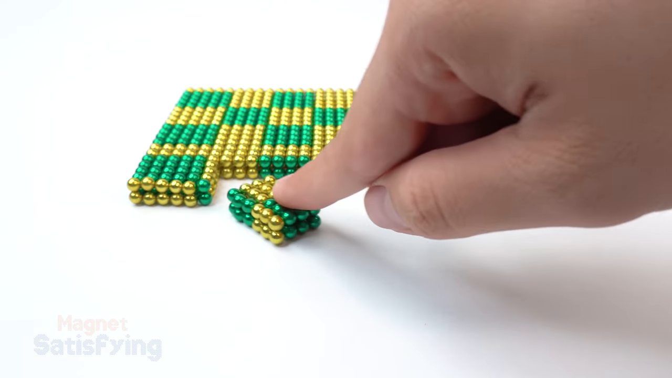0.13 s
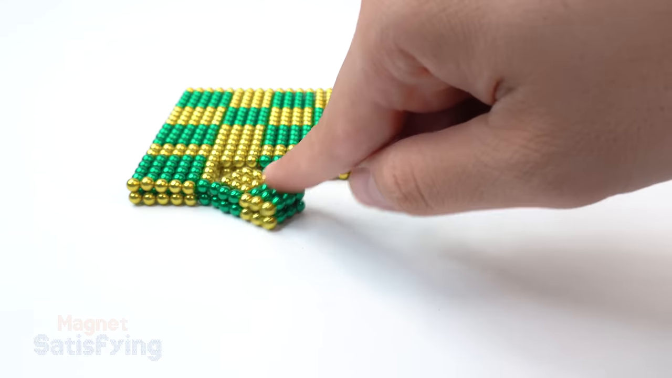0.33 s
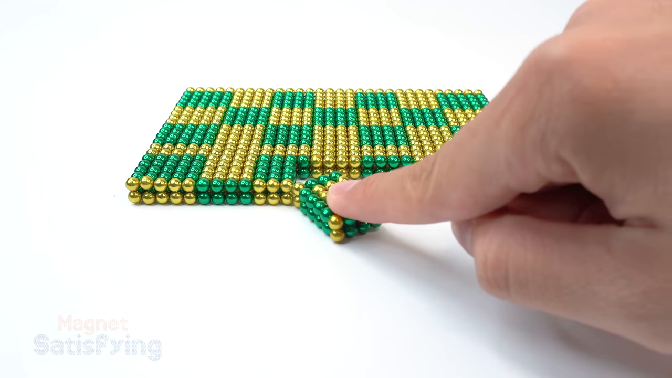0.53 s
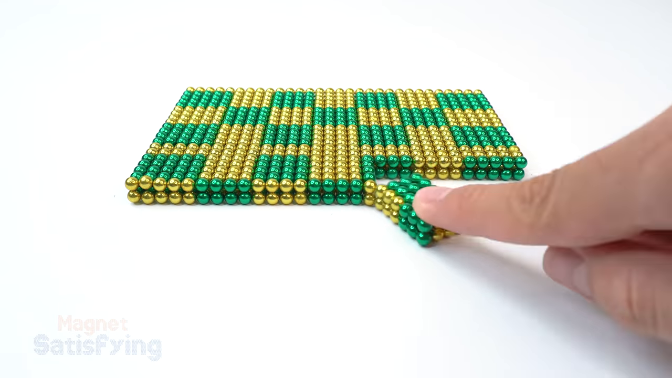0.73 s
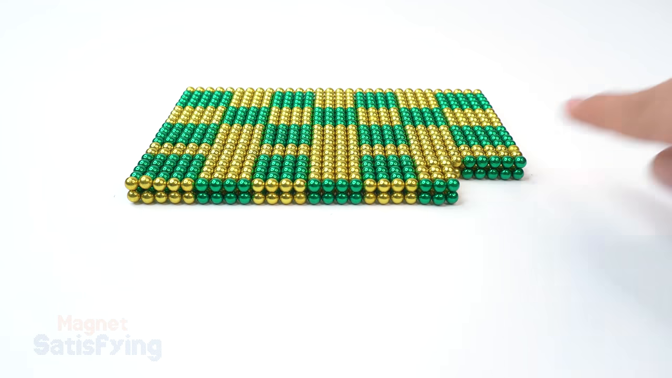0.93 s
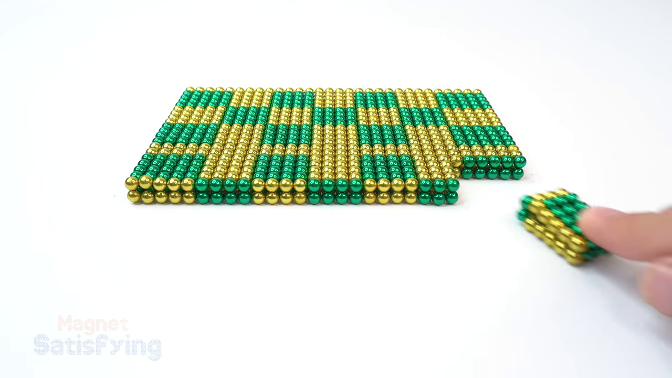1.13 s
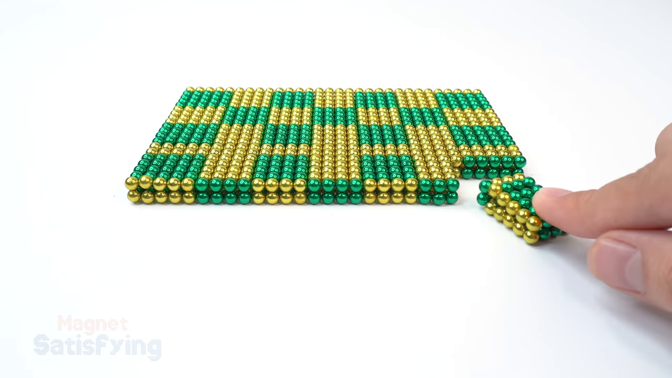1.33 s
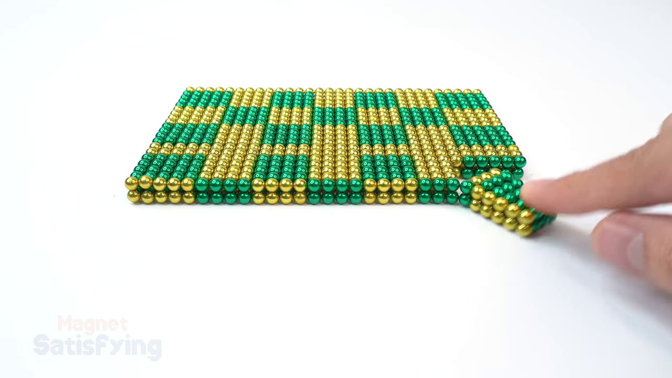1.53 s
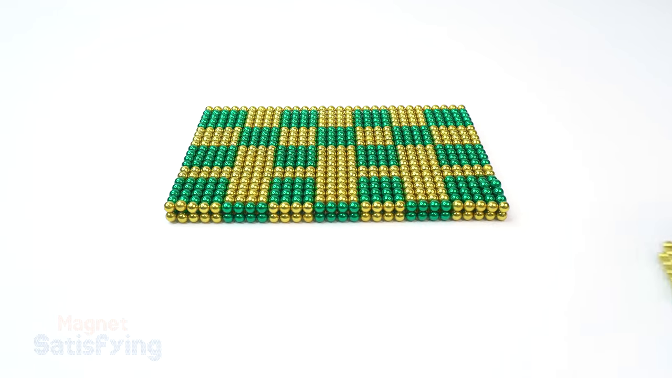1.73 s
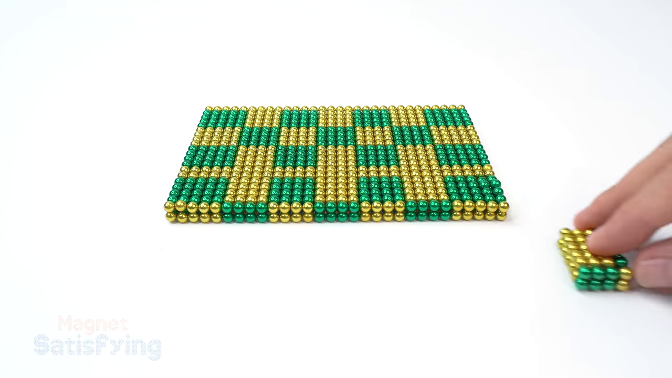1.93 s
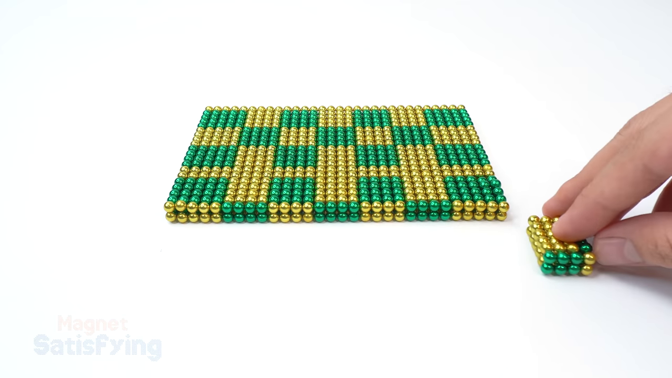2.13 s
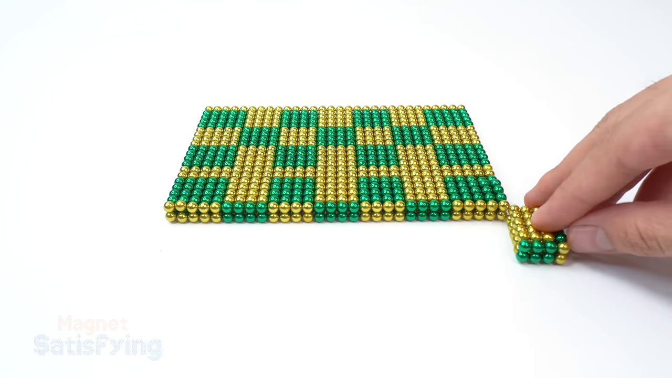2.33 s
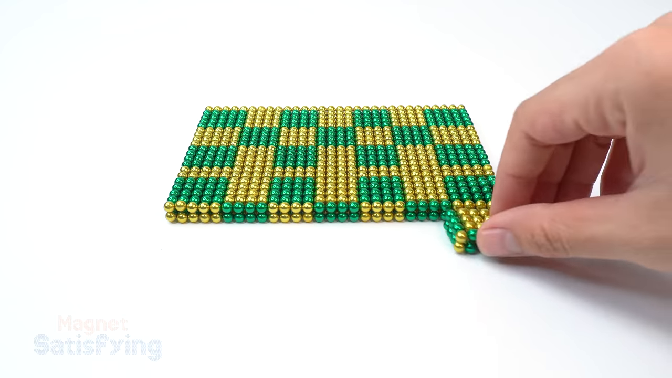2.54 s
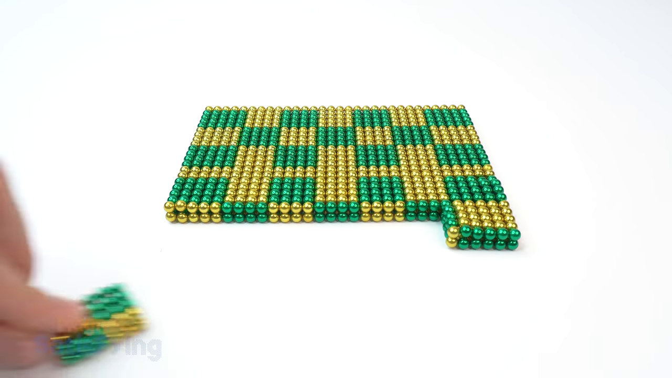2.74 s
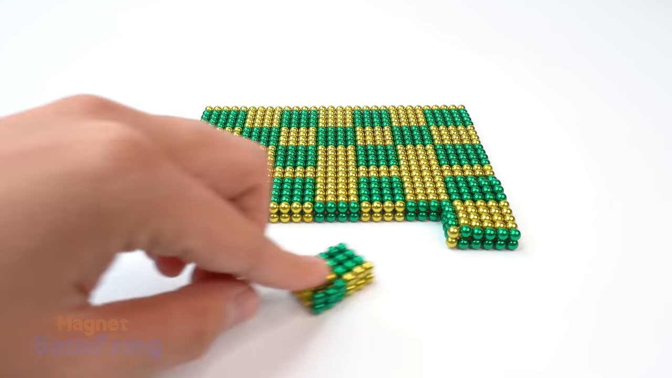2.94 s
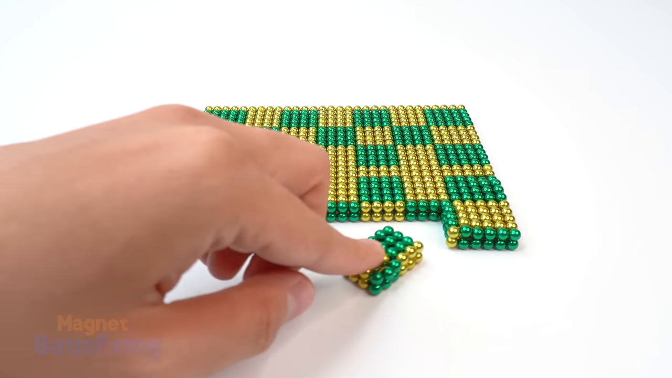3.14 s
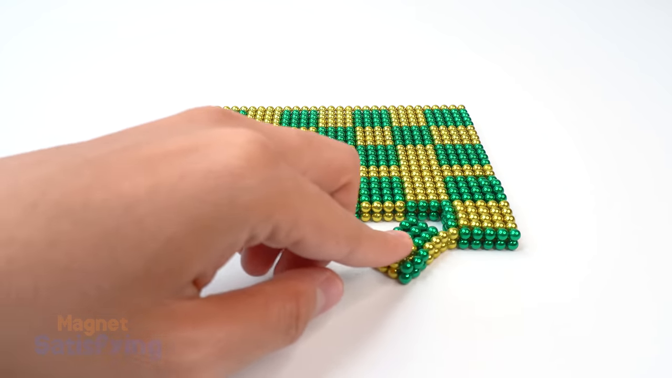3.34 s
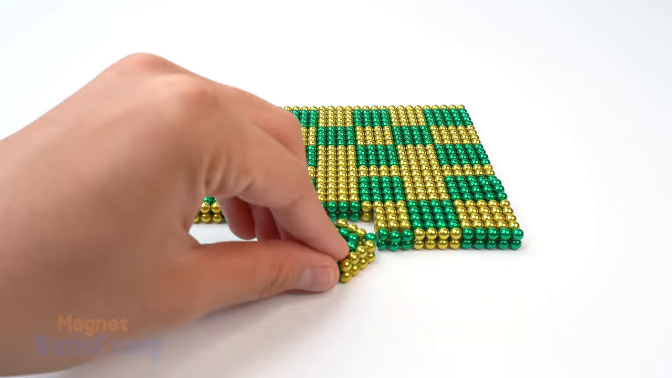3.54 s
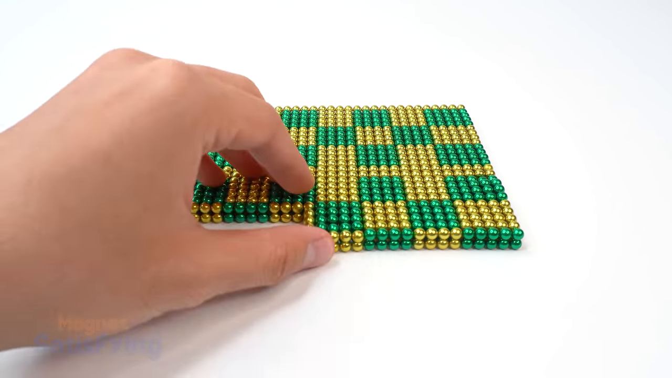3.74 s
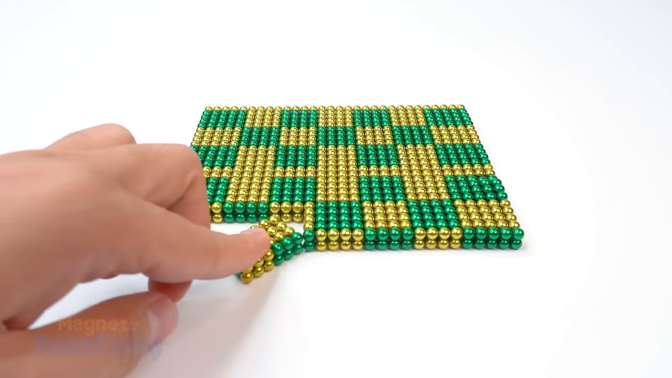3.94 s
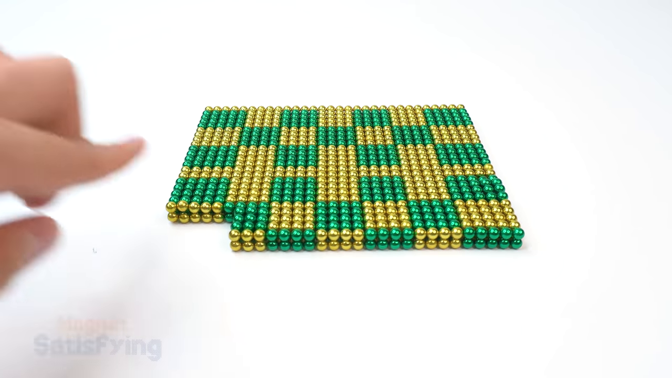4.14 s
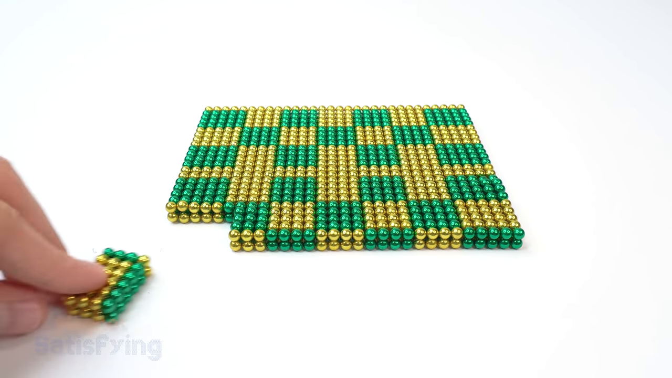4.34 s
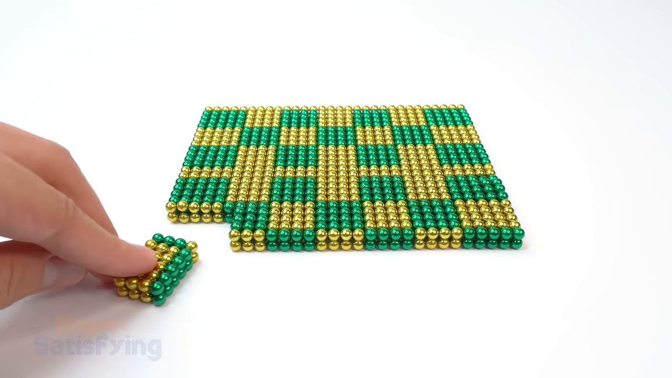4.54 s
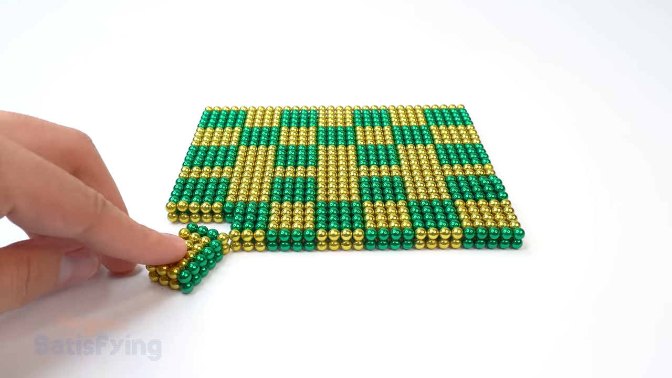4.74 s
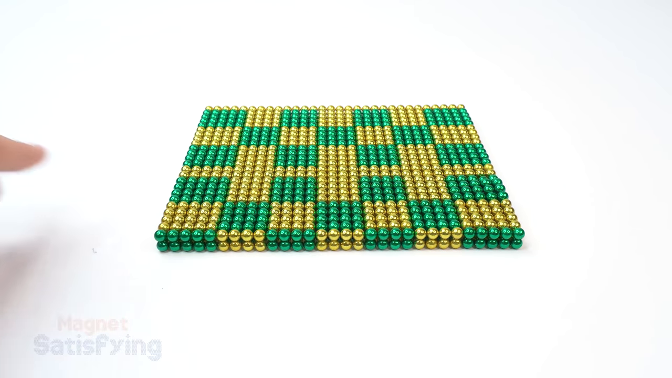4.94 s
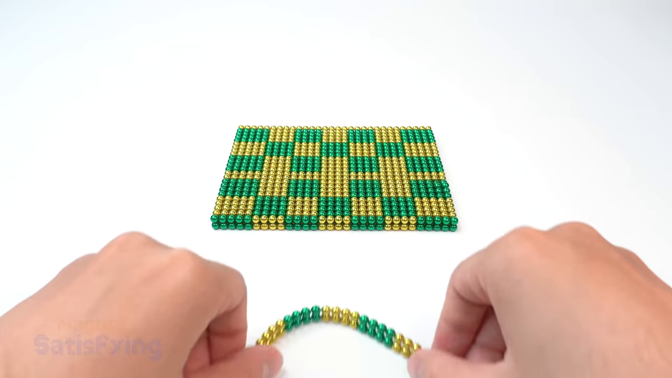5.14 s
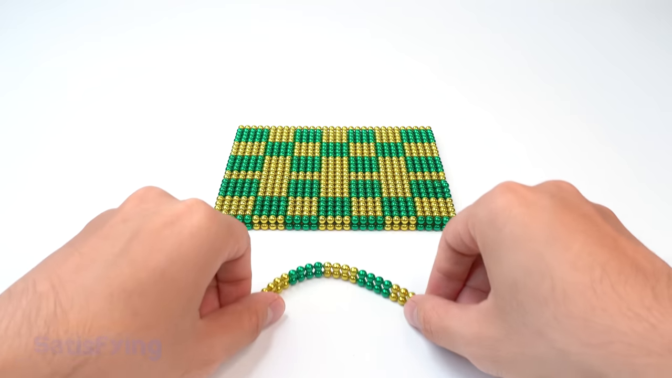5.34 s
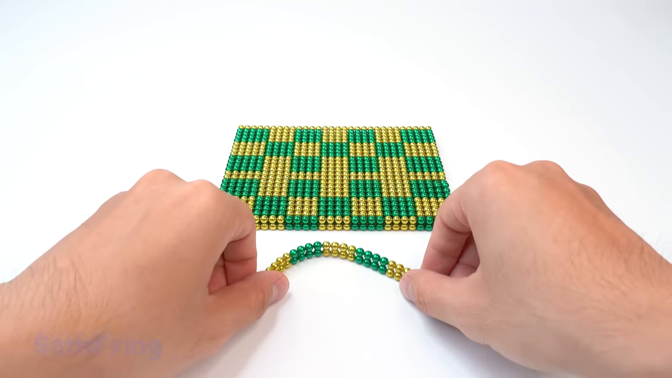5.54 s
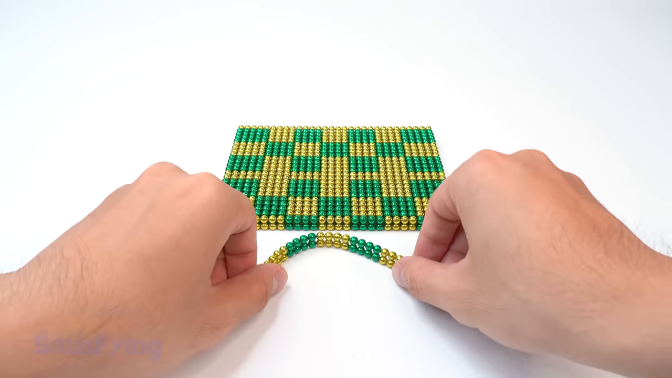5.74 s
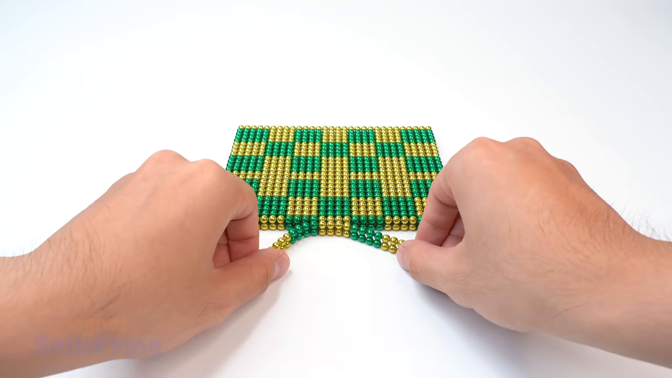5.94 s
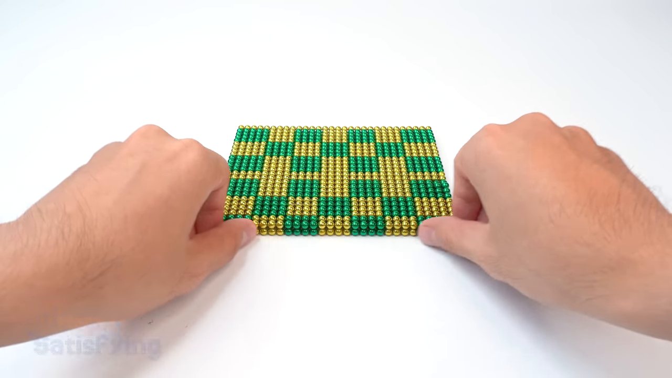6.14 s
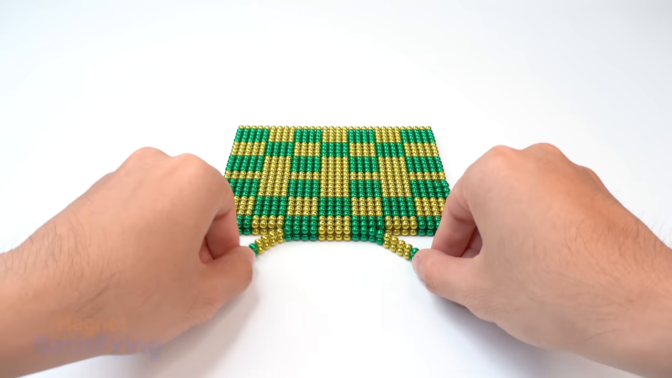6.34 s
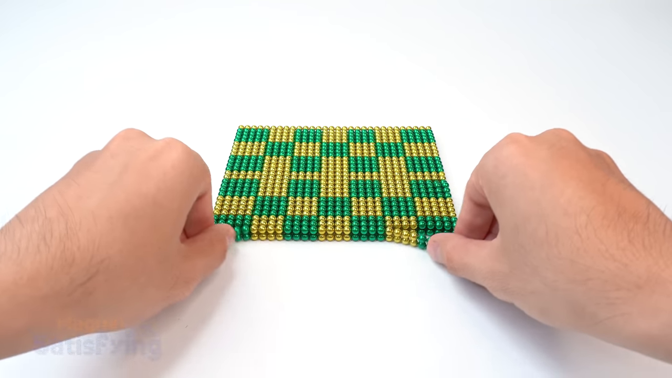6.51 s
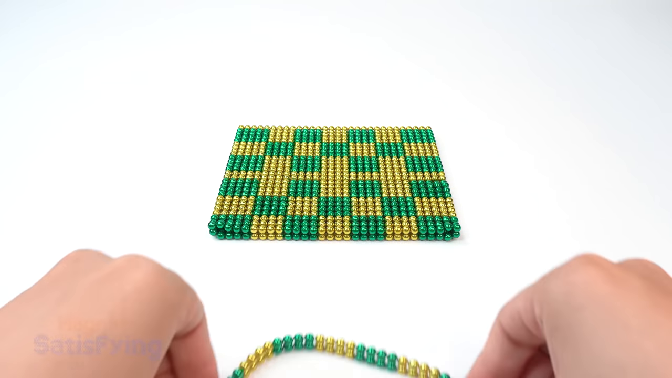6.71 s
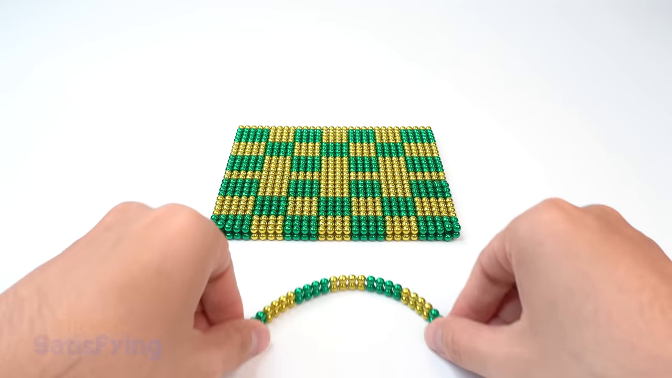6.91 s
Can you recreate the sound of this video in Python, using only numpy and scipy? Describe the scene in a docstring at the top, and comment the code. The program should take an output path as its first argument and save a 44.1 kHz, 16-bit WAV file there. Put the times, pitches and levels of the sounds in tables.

```python
"""Small magnetic balls, in blocks and a chain, are pushed across a table until they snap onto a slab of the same balls.
A corner catches with one click, a burst of contacts; then rows zip shut in a swelling rattle of contacts.
The table top knocks, drums and rings along, as noise and impulses through its resonances.
Between the snaps a soft rush of shaped noise swells and fades as hands and blocks slide about.
One close microphone, a small room with short reflections and a diffuse tail."""
import sys
import numpy as np
from scipy import signal
from scipy.fft import rfft, irfft
from scipy.io import wavfile

SR = 44100
rng = np.random.default_rng(int(sys.argv[2]) if len(sys.argv) > 2 else 0)


def unload_wav(signal):
    """Save mono or channel-first audio to the path in sys.argv[1] as 16-bit WAV at rate SR, clipped to [-1, 1]."""
    wavfile.write(
        sys.argv[1],
        SR,
        np.round(np.clip(np.atleast_2d(signal).T, -1, 1) * 32767).astype(np.int16),
    )


N = 311787
TIME = np.arange(N) / SR
# In all tables of sources and colours, levels are relative: each layer has its own reference.

# A few balls jump together:
# t/s, click level/dB, table knock level/dB, block ring level/dB, ring pitch [multiple of the usual]
SNAP_EVENTS = [(.350, -31, -26.5, -28, 1), (0.5888, -14, -20, -17.5, 1.17), (0.836, -5, -22, -19, 1.08),
               (1.554, -6, -23.5, -18.5, .98), (2.420, -6.5, -21.5, -19, 1), (2.679, -17, -21.5, -21, .6),
               (3.335, -8, -26.5, -12.5, 1.08), (3.666, -48.5, -35.5, -35.5, .6),
               (3.817, -29.5, -36, -20, 1.18), (3.833, -2, -17, -14.5, 1.2), (3.990, -9.5, -29, -23, 1.4),
               (4.820, -10.5, -17, -16.5, 1.04), (6.0044, -18, -24.5, -20, .75),
               (6.053, -41, -27.5, -34, .6), (6.259, -13, -26, -14.5, .6), (6.276, -7, -18.5, -23, 1.04),
               (6.305, -9, -26, -25, 1.15), (6.6434, -12, -27, -19, 1.13), (6.6814, -3, -18, -17, .6)]
# Colour of ball on ball: f/Hz, level/dB per Hz
CLICK_COLOUR = [(25, -13.5), (200, -4.5), (600, -14), (1500, -3.5), (3000, -1), (5500, -1.5), (8500, 1.5),
                (11000, 2), (14000, 1.5), (16000, -4.5)]
# Colour of the ringing block: f/Hz, level/dB per Hz
BLOCK_COLOUR = [(500, -34), (2000, -14), (3100, -12), (3750, 5), (4400, -1), (5200, -11.5), (9000, -21),
                (16000, -33)]
# Decay of the table's ring: f/Hz, t60/s
TABLE_DECAY = [(200, .2), (530, 0.086), (1400, 0.1), (3700, 0.08), (10000, 0.023)]


def snaps(hold=0.0012, seat_t60=0.0049, block_t60=0.028, rate=5000,
          knock_db=21, thump_db=20, click_db=-1, block_db=-1, thump_delay=.002):
    """Each snap is a tight burst of contacts that rings the block, thumps the table and sets it shivering."""
    clicks, knocks, block = np.zeros((3, N))
    t = np.arange(SR // 16) / SR
    burst = np.exp(-np.log(1000) * np.maximum(t - hold, 0) / seat_t60)
    ring_decay = np.exp(-np.log(1000) * t / block_t60)
    for s, db, table_db, ring_db, pitch in SNAP_EVENTS:
        add(clicks, s, amp(db + click_db) * burst * contacts(len(t), rate))
        add(knocks, s + thump_delay, amp([table_db + thump_db]))  # the thump: one impulse
        add(knocks, s, amp(table_db + knock_db) * tail(TABLE_DECAY, rise=0.0012))
        ring = ring_decay * rng.standard_normal(len(t))
        pitched_colour = [(pitch * hz, level) for hz, level in BLOCK_COLOUR]
        add(block, s, amp(ring_db + block_db) * coloured(ring, pitched_colour))
    return coloured(clicks, CLICK_COLOUR) + block, knocks


def zips(knock_db=1, block_db=-4, block_t60=.022):
    """Row pulls row: a swelling run of contacts that rings the block and shakes the table."""
    clicks, knocks, block = np.zeros((3, N))
    t = np.arange(SR // 16) / SR
    ring_decay = np.exp(-np.log(1000) * t / block_t60)
    for start, build_up, hold, db, swell_db, table_db, ring_db, rate in runs():
        pull = swell(build_up, hold, swell_db)
        run = contacts(len(pull), rate) * rows_landing(len(pull))
        ring = ring_decay * rng.standard_normal(len(t))
        ring /= np.linalg.norm(ring)
        shaking = signal.fftconvolve(np.sqrt(pull) * run, tail(TABLE_DECAY, rise=0.00076))
        add(clicks, start, amp(db) * pull * run)
        add(block, start, amp(ring_db + block_db) * signal.fftconvolve(pull * run, ring))
        add(knocks, start, amp(table_db + knock_db) * shaking)
    return coloured(clicks, CLICK_COLOUR) + coloured(block, BLOCK_COLOUR), knocks


# Rows of balls zip shut:
# closing t/s, build-up/s, hold/s, click level/dB, table level/dB, block ring level/dB
ZIP_EVENTS = [(.477, .018, .012, -11.5, -23.5, -26.5), (0.752, .013, 0.01, -11.5, -25, -24),
              (0.984, .014, .011, -10.5, -18.5, -17.5), (1.697, .018, 0.0079, -9, -17.5, -20.5),
              (3.520, .032, 0.0092, -10, -23.5, -20), (4.158, .018, 0.0068, -10.5, -22, -22.5),
              (4.982, 0.057, .010, -10, -29.5, -23.5), (6.255, .022, .006, -29, -26, -27)]
# A loose row of balls clatters along the slab:
# t/s, hold after the rise/s, click level/dB, table level/dB, block ring level/dB
CLATTER_EVENTS = [(.812, 0.065, -39.5, -27, -31), (6.01, .04, -46.5, -47, -55),
                  (6.277, .048, -30, -30.5, -43), (6.641, .04, -25.5, -26.5, -39)]
ZIP_SWELL_DB, ZIP_CONTACTS_PER_S = 37.5, 5700
RATTLE_RISE_S, RATTLE_SWELL_DB, RATTLE_CONTACTS_PER_S = .003, 4.5, 1200
# Before every zip the first rows creep together; levels are added to the zip's.
CREEP_S, CREEP_SWELL_DB, CREEP_CLICK_DB, CREEP_TABLE_DB, CREEP_BLOCK_DB = .042, 21, -26.5, -16, -14
# After every zip the balls settle in a short rattle; levels are added to the zip's.
SETTLE_DELAY_S, SETTLE_S = .004, .022
SETTLE_CLICK_DB, SETTLE_TABLE_DB, SETTLE_BLOCK_DB = -32.5, -9.5, -11


def runs():
    """Every zip with its creep and its settling, and every clatter, as runs of contacts.

    Columns: t/s, build-up/s, hold/s, click level/dB, swell/dB, table level/dB, block level/dB, contacts per s."""
    zipping, rattles = [], list(CLATTER_EVENTS)
    for s, build_up, hold, db, table_db, ring_db in ZIP_EVENTS:
        zipping.append((s - CREEP_S, CREEP_S, 0, db + CREEP_CLICK_DB, CREEP_SWELL_DB,
                        table_db + CREEP_TABLE_DB, ring_db + CREEP_BLOCK_DB, ZIP_CONTACTS_PER_S))
        zipping.append((s - build_up, build_up, hold, db, ZIP_SWELL_DB,
                        table_db, ring_db, ZIP_CONTACTS_PER_S))
        rattles.append((s + hold + SETTLE_DELAY_S, SETTLE_S, db + SETTLE_CLICK_DB,
                        table_db + SETTLE_TABLE_DB, ring_db + SETTLE_BLOCK_DB))
    rattling = [(s, RATTLE_RISE_S, hold, db, RATTLE_SWELL_DB, table_db, ring_db, RATTLE_CONTACTS_PER_S)
                for s, hold, db, table_db, ring_db in rattles]
    return zipping + rattling


def rows_landing(count, row_rate=280, unevenness=.3):
    """The rattle pulses each time a whole row lands, at an uneven rate in rows per second; rms 1."""
    steps = rng.standard_normal(count // 128 + 1)
    speed = row_rate * np.exp(unevenness * steps).repeat(128)[:count]
    cycles = np.cumsum(speed) / SR + rng.random()
    pulsing = amp(6.5 * np.cos(2 * np.pi * cycles))
    return pulsing / np.sqrt(np.mean(pulsing ** 2))


def contacts(count, rate, scatter_db=4):
    """Ball-on-ball impulses of uneven spacing and size, rms 1."""
    due = np.cumsum(rng.exponential(1, count) ** 2) * rate / SR / 2
    hit = np.diff(np.floor(due), prepend=-1) > 0
    train = hit * rng.choice([-1, 1], count) * amp(scatter_db * rng.standard_normal(count))
    return train / np.sqrt(np.mean(train ** 2))


def swell(build_up, hold, swell_db):
    """The pull grows as the gap closes, then holds until the balls are seated."""
    t = np.arange(round((build_up + hold) * SR) + 16) / SR
    return amp(np.interp(t, [0, build_up], [-swell_db, 0]))


# Tugged by the slab, a block judders over the table top: t/s, length/s, level/dB
JUDDER_EVENTS = [(0.427, 0.045, -30), (0.695, .05, -35.5), (0.943, 0.034, -40.5), (1.539, 0.012, -43),
                 (1.635, .045, -41), (2.395, 0.025, -41), (2.666, 0.017, -33.5), (3.32, 0.019, -36.5),
                 (3.472, 0.032, -21.5), (3.971, 0.021, -33.5), (4.113, .04, -29), (4.773, .048, -35.5),
                 (4.92, 0.027, -20), (5.971, .03, -51.5), (6.222, 0.032, -46), (6.609, .032, -39.5)]
# Colour of the drumming: f/Hz, level/dB per Hz
JUDDER_COLOUR = [(30, -39.5), (170, -40), (320, -24), (520, -0.5), (850, 1), (1400, -8.5), (2500, -18),
                 (5000, -26), (15000, -50.5)]
JUDDER_RISE_S, JUDDER_SWELL_DB = .011, 15
# A harder judder ticks more: extra dB of ticking per dB over the usual.
JUDDER_USUAL_DB, JUDDER_BRIGHTENS = -29, 0.48


def judders(rate=1500, tick_db=-8):
    """Tugged by the slab, a block stutters over the table and drums on it; its balls tick against the top."""
    drumming, ticks = np.zeros((2, N))
    for start, length, db in JUDDER_EVENTS:
        pull = swell(JUDDER_RISE_S, length - JUDDER_RISE_S, JUDDER_SWELL_DB)
        stutter = amp(db) * pull * contacts(len(pull), rate)
        brightness_db = JUDDER_BRIGHTENS * (db - JUDDER_USUAL_DB)
        add(drumming, start, signal.fftconvolve(stutter, tail(TABLE_DECAY, rise=0.00092)))
        add(ticks, start, amp(tick_db + brightness_db) * stutter)
    return coloured(drumming, JUDDER_COLOUR, table_top) + coloured(ticks, RUB_COLOUR, table_top)


# Table top resonances: f/Hz, width/Hz, level/dB
TABLE_MODES = [(150, 45, 1), (313, 5.8, -1.5), (482, 78, -3.5), (595.6, 45, 0), (758.3, 22, 6.5),
               (805, 30, 3.5), (1000, 48, -3), (1118.4, 57, -1.5), (1340, 100, -2), (1678, 43, -1.5),
               (2100, 150, -8), (2686, 53, -15.5)]


def table_top(hz, between_db=-9):
    """Gain of the table's resonances, with a floor for the level between them."""
    peaks = sum(amp(db) ** 2 / (1 + (2 * (hz - centre) / width) ** 2)
                for centre, width, db in TABLE_MODES)
    return np.sqrt(amp(between_db) ** 2 + peaks)


# A stroke over the table speeds up, runs on and slows to rest: t/s, speed-up/s, steady/s, slow-down/s,
# body level/dB, rub level/dB, body resonance f/Hz, rub corner f/Hz
SLIDE_EVENTS = [(0, 0.0016, 0.0026, 0.3, -51, -62.5, 736, 2420),
                (.875, 0.076, 0.014, .03, -43, -39, 760, 4000),
                (1.045, 0.0045, .17, 0.21, -42, -40.5, 840, 4560),
                (1.816, .003, 0.0053, .41, -41, -36.5, 720, 3450),
                (2.48, 0.009, 0.031, 0.23, -42, -56.5, 726, 4100),
                (2.715, .004, 0.25, 0.36, -45.5, -43.5, 793, 5200),
                (3.67, 0.0024, 0.0028, 0.1, -53, -56.5, 597, 2680),
                (3.88, 0.0048, 0.058, 0.096, -43, -64, 800, 3100),
                (4.252, 0.0026, 0.057, 0.45, -41.5, -45, 764, 5680),
                (5.087, .003, 0.12, 0.89, -45.5, -46, 502, 3830),
                (5.74, 0.017, 0.018, 0.14, -64.5, -90, 496, 2400),
                (6.06, 0.066, 0.023, 0.28, -45, -41.5, 488, 3300),
                (6.35, .11, 0.016, 0.32, -46.5, -43.5, 480, 3360),
                (6.75, 0.014, 0.018, 0.78, -46, -44.5, 604, 4450)]
# Colours of the hollow body and of the grainy rub: f/Hz, level/dB per Hz
BODY_COLOUR = [(30, -48.5), (130, -33), (300, -10.5), (470, 2), (800, -0.5), (1200, -1.5), (1800, -16.5),
               (3000, -33), (8000, -74.5)]
RUB_COLOUR = [(100, -59.5), (400, -27), (900, 6), (1400, 3), (2300, -6.5), (3200, -12), (5200, -15.5),
              (16000, -31)]
START_SPEED = 0.71  # share of a stroke's full speed at first touch
BODY_POWER, RUB_POWER, HISS_POWER = 2.13, 4.28, 3.1  # each layer's amplitude goes with this power of speed


def slides(hiss_db=-21, grain_rate=9000, body_boost=1.0, rub_q=2.1, waver_db=2.0,
           scrape_hz=2250, scrape_q=4, scrape_boost=0.6):
    """Soft friction: a hollow table body, a grainy rub and a fine hiss; slowing makes it softer and duller."""
    out = np.zeros(N)
    for s, speed_up, steady, slow_down, body_db, rub_db, body_hz, rub_hz in SLIDE_EVENTS:
        corners = np.cumsum([0, speed_up, steady, slow_down])
        t = np.arange(0, corners[-1] + .05, 1 / SR)
        speed = np.interp(t, corners, [START_SPEED, 1, 1, 0])
        knots = np.arange(0, t[-1], .02)
        pressure = amp(waver_db * np.interp(t, knots, rng.standard_normal(len(knots))))
        body_level = pressure * amp(body_db) * speed ** BODY_POWER
        rub_level = pressure * amp(rub_db) * speed ** RUB_POWER
        hiss_level = pressure * amp(rub_db + hiss_db) * speed ** HISS_POWER
        hollow = resonance(body_hz, 2.2, body_boost)
        edge = roll_off(rub_hz, rub_q)
        scrape = resonance(scrape_hz, scrape_q, scrape_boost)
        body = body_level * rng.standard_normal(len(t))
        rub = rub_level * contacts(len(t), grain_rate)
        hiss = hiss_level * contacts(len(t), grain_rate)
        add(out, s, coloured(body, BODY_COLOUR, lambda hz: table_top(hz) * hollow(hz)))
        add(out, s, coloured(rub, RUB_COLOUR, lambda hz: edge(hz) * scrape(hz)))
        add(out, s, coloured(hiss, HISS_COLOUR))
    return out


def resonance(centre_hz, q, boost):
    """Gain of one broad bump, as a function of frequency."""
    return lambda hz: 1 + boost / (1 + (2 * q * (hz - centre_hz) / centre_hz) ** 2)


def roll_off(corner_hz, q):
    """Gain that peaks near the corner and falls away above it, as a function of frequency."""
    return lambda hz: 1 / np.hypot(1 - (hz / corner_hz) ** 2, hz / corner_hz / q)


# A fine hiss swells and fades as a hand brushes past: middle t/s, half length/s, level/dB
BRUSH_EVENTS = [(2.914, 0.17, -48.5), (5.32, .25, -57), (6.863, 0.24, -55)]
# Colour of the fine hiss: f/Hz, level/dB per Hz
HISS_COLOUR = [(300, -60.5), (2000, -19.5), (5500, -2), (8500, -0.5), (12000, -6), (16000, -4.5)]


def brushes(grain_rate=9000, edge_db=-30):
    """Skin brushing past: a bell-shaped swell of fine hiss, edge_db down at its ends."""
    level = sum(amp(db + edge_db * ((TIME - s) / half) ** 2) for s, half, db in BRUSH_EVENTS)
    return coloured(level * contacts(N, grain_rate), HISS_COLOUR)


# The ringing stops short after a cluster: t/s, gain/dB
HUSH_EVENTS = [(.87, -18.5), (1.035, -21.5), (1.766, -36), (2.472, -13), (2.712, -18), (4.232, -28.5),
               (5.072, -18.5), (6.056, -10.5), (6.34, -16.5)]


def hush(fade=0.0013):
    """Gain that drops quickly where the ringing stops short and comes back at the next judder or snap."""
    gain_db = np.zeros(N)
    for s, db in HUSH_EVENTS:
        later = (start for start, *_ in JUDDER_EVENTS + SNAP_EVENTS if start > s + fade)
        until = min(later, default=N / SR)
        gain_db += np.interp(TIME, [s - fade, s + fade, until, until + fade], [0, db, db, 0])
    return amp(gain_db)


# Reflections from nearby surfaces: delay t/s, level/dB against the direct sound
REFLECTIONS = [(.0033, -2.5), (.0052, -14), (.012, -22), (.0205, -20)]
# Colour of the room's tail: f/Hz, level/dB per Hz
DIFFUSE_COLOUR = [(100, -14), (1000, -0.5), (4000, 6), (6500, -3), (15000, -3.5)]


def room(x, wet_db=-19, t60=0.19, rise=0.0046):
    """Nearby surfaces double each click; the diffuse tail is a smooth hiss carrying the clicks' dying energy."""
    out = x.copy()
    for delay, db in REFLECTIONS:
        add(out, delay, amp(db) * x)
    t = np.arange(SR // 3) / SR
    decay = (np.exp(-np.log(1000) * t / t60) * (1 - np.exp(-t / rise))) ** 2
    energy = np.abs(signal.oaconvolve(x ** 2, decay / decay.sum())[:N])
    diffuse = np.sqrt(energy) * rng.standard_normal(N)
    return out + amp(wet_db) * coloured(diffuse, DIFFUSE_COLOUR)


def tail(decays, rise):
    """A fresh dense ring of unit energy, each frequency dying at its own speed."""
    hz, t, z = signal.stft(rng.standard_normal(SR // 4), SR, nperseg=128)
    fading = amp(-60 * t / along(decays, hz)[:, None])
    ring = signal.istft(z * fading, SR)[1]
    ring *= 1 - np.exp(-np.arange(len(ring)) / SR / rise)
    return ring / np.linalg.norm(ring)


def coloured(x, spectrum, lift=lambda hz: 1, size=8192):
    """Causal minimum-phase filter of unit energy: the given colour times an optional resonance gain."""
    hz = np.fft.rfftfreq(size, 1 / SR)
    cepstrum = irfft(np.log(amp(along(spectrum, hz)) * lift(hz)))
    cepstrum[1:size // 2] *= 2  # fold the cepstrum forward in time
    cepstrum[size // 2 + 1:] = 0
    response = irfft(np.exp(rfft(cepstrum)))[:size // 2]
    return signal.oaconvolve(x, response / np.linalg.norm(response))[:len(x)]


def amp(db):
    """Decibels to gain."""
    return 10 ** (np.asarray(db) / 20)


def along(points, hz):
    """(f/Hz, value) points read on a log frequency axis."""
    f, v = np.transpose(points)
    return np.interp(np.log(hz + 1), np.log(f), v)


def add(track, s, sound):
    """Mix a sound into the track from time s on."""
    part = track[max(round(s * SR), 0):][:len(sound)]
    part += sound[:len(part)]


# Colour of the table's knock: f/Hz, level/dB per Hz
KNOCK_COLOUR = [(30, -43.5), (150, -26), (280, -11), (480, 1.5), (900, 2.5), (1500, 1), (2500, -1.5),
                (4500, -9.5), (8000, -26), (16000, -51.5)]
# Decay of the room around the table: f/Hz, t60/s
ROOM_DECAY = [(300, 0.29), (2000, .22)]


def scene(floor_db=-90, table_wet_db=-17):
    """Clicks and table in the room, sliding and brushing close by, and a very faint room floor."""
    snap_clicks, snap_knocks = snaps()
    zip_clicks, zip_knocks = zips()
    table = coloured(snap_knocks + zip_knocks, KNOCK_COLOUR, table_top) + judders()
    table_tail = signal.oaconvolve(table, tail(ROOM_DECAY, rise=0.011))[:N]
    table_in_room = table + amp(table_wet_db) * table_tail
    clicks_in_room = room(snap_clicks + zip_clicks)
    floor = amp(floor_db) * coloured(rng.standard_normal(N), BODY_COLOUR)
    mix = hush() * (clicks_in_room + table_in_room) + slides() + brushes() + floor
    return mix[None]


def record(dry, top=0.72, band_limit_hz=16000):
    """The close microphone: the sharpest peaks are rounded off and the band above the limit is filtered out."""
    rounded = dry / (1 + (dry / top) ** 4) ** (1 / 4)
    low_pass = signal.firwin(201, band_limit_hz, window="blackman", fs=SR)
    return signal.oaconvolve(rounded, low_pass[None], mode="same", axes=1)


dry = scene()
out = record(dry)
unload_wav(out)
```